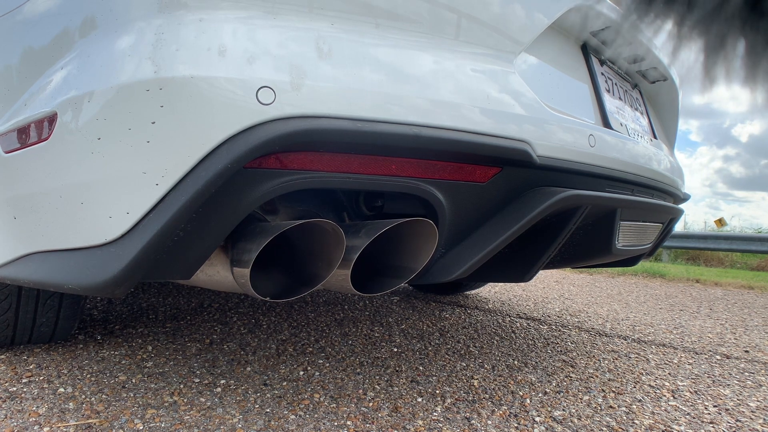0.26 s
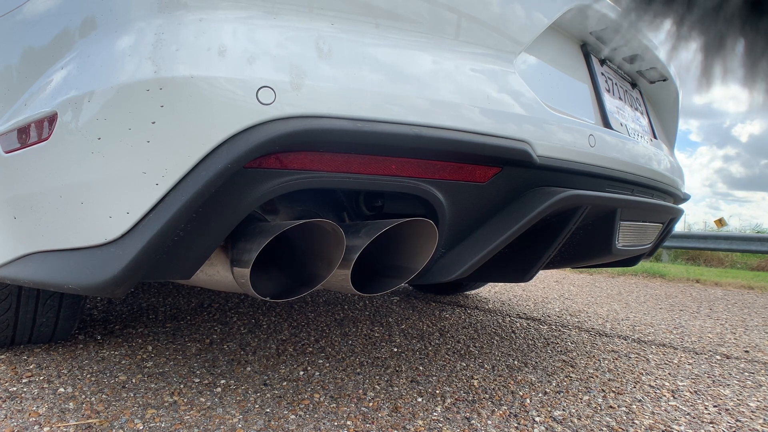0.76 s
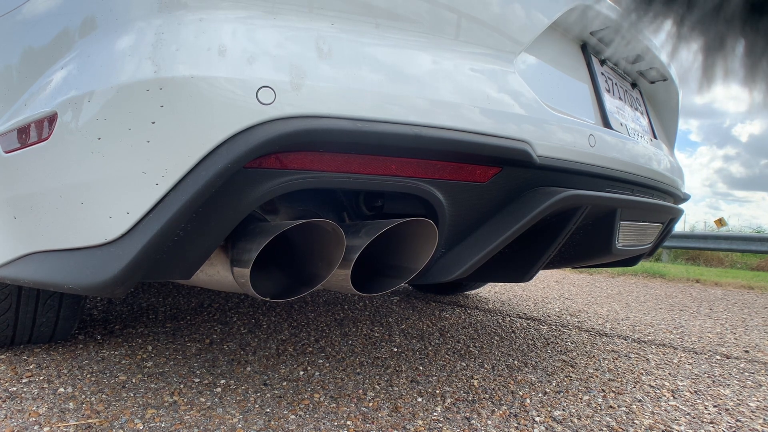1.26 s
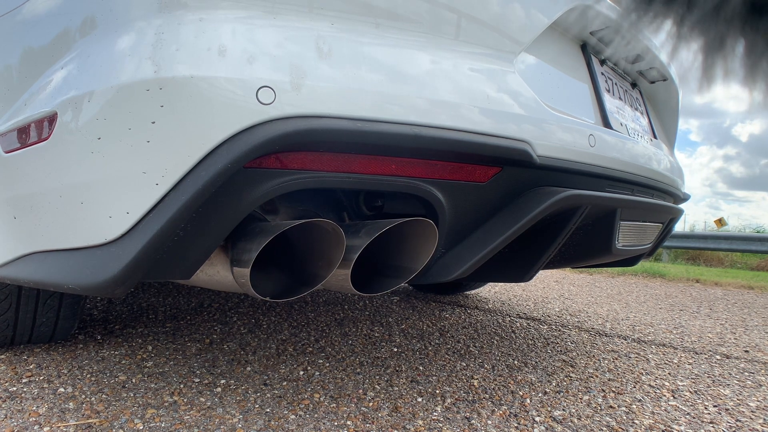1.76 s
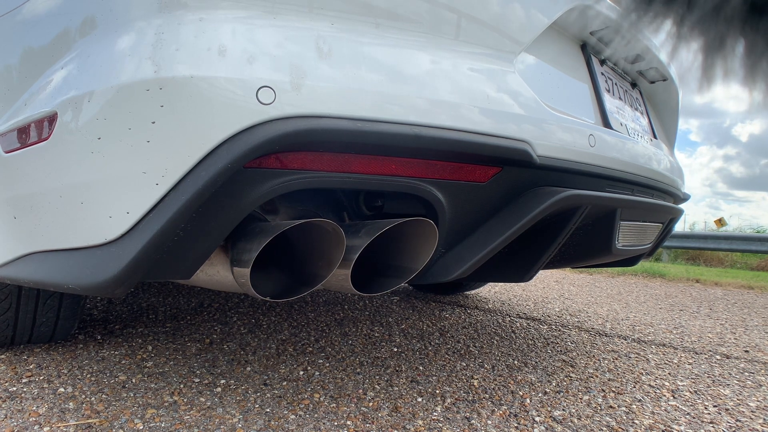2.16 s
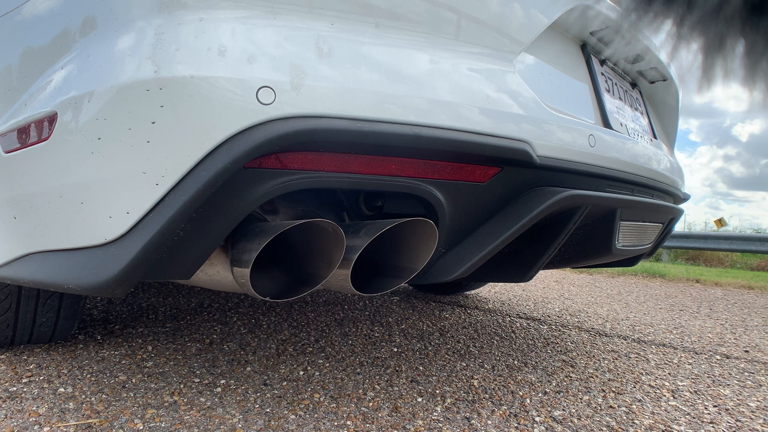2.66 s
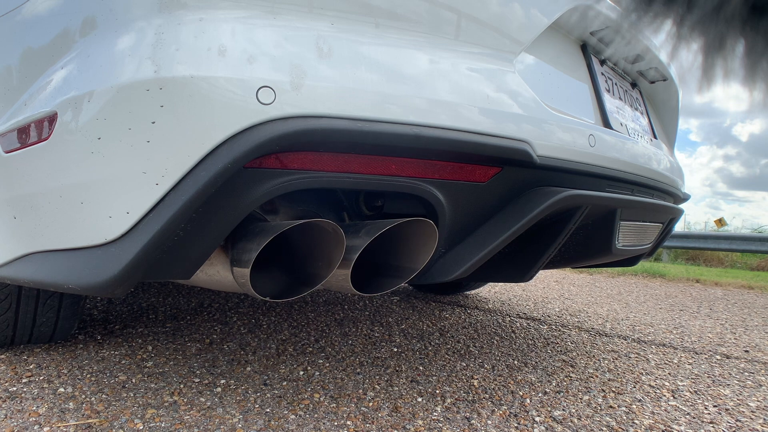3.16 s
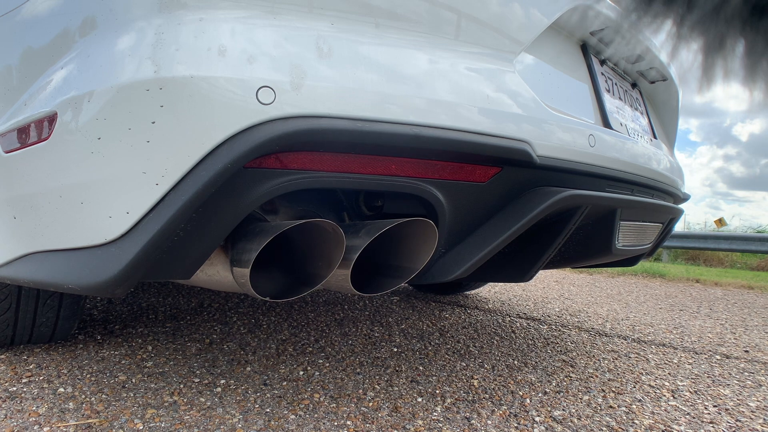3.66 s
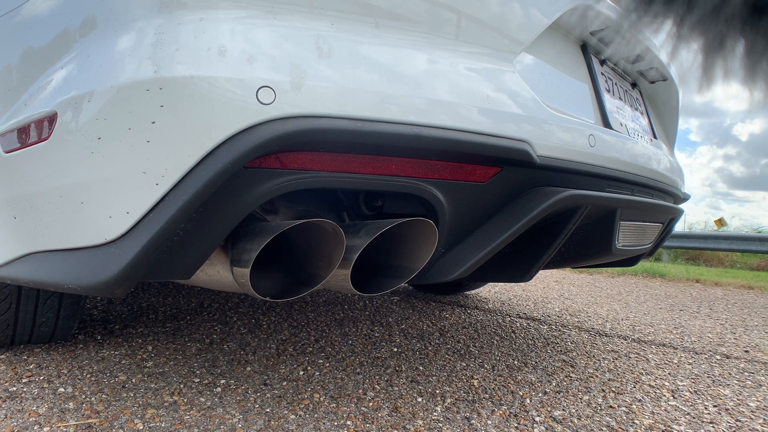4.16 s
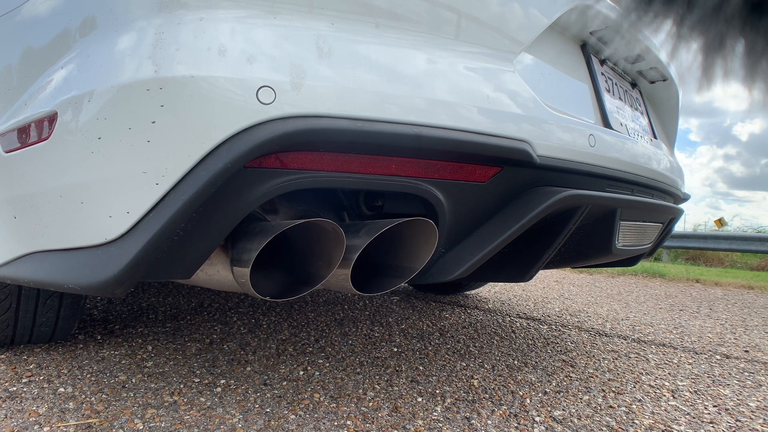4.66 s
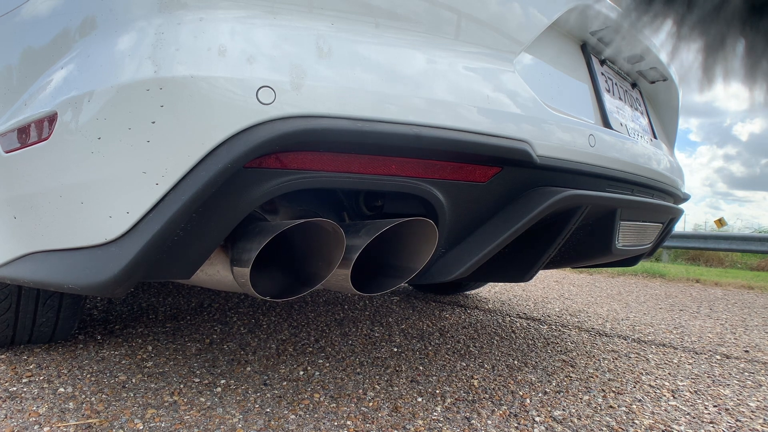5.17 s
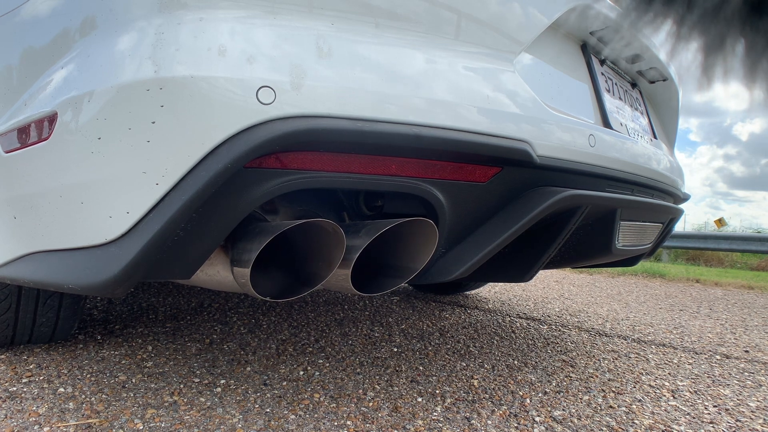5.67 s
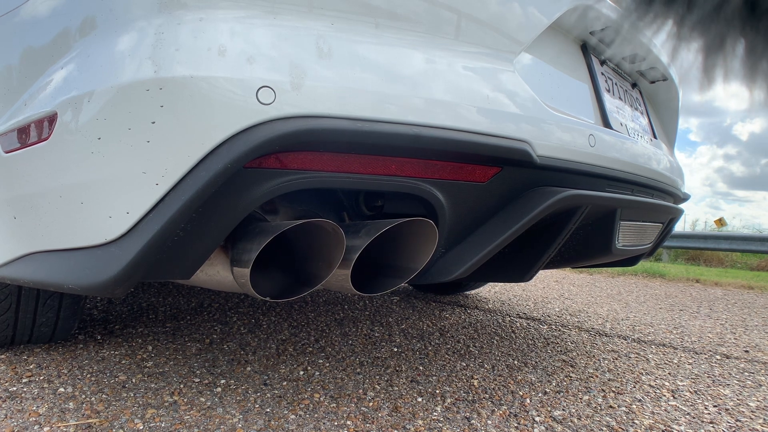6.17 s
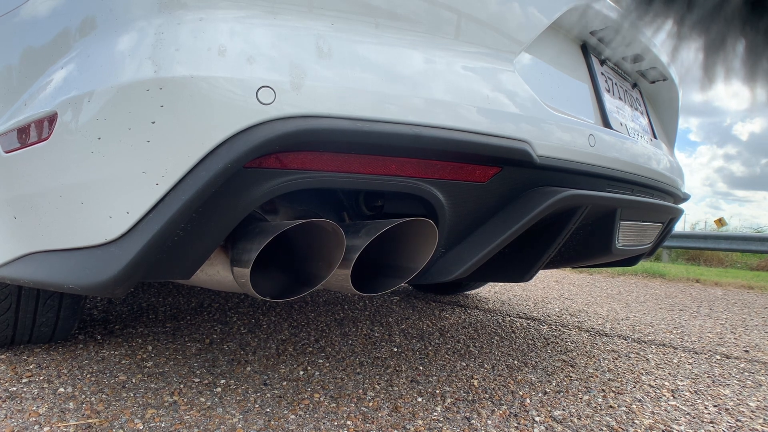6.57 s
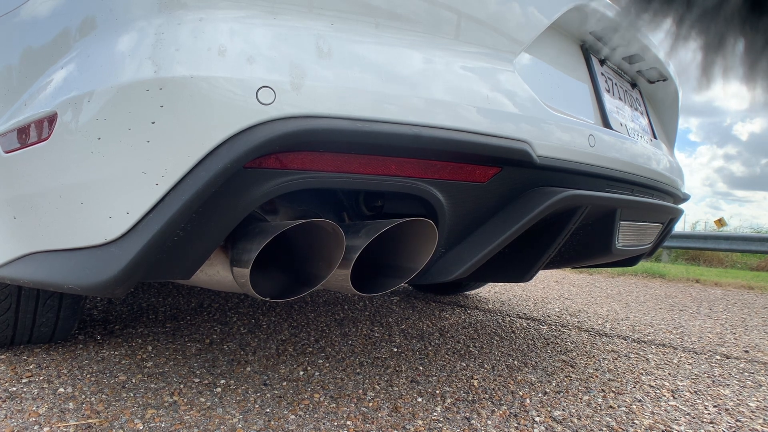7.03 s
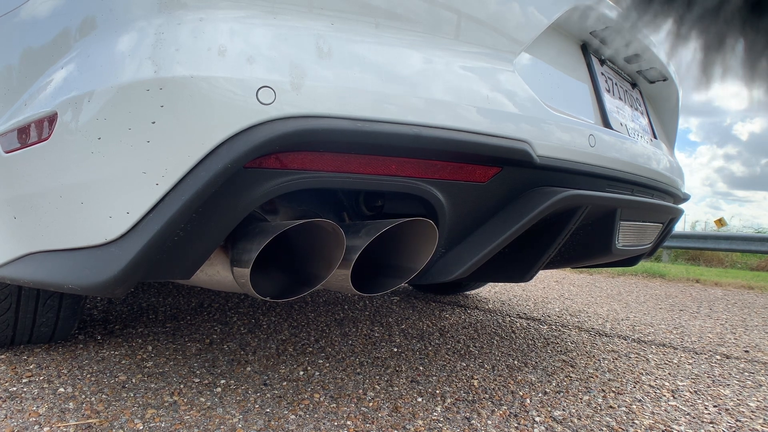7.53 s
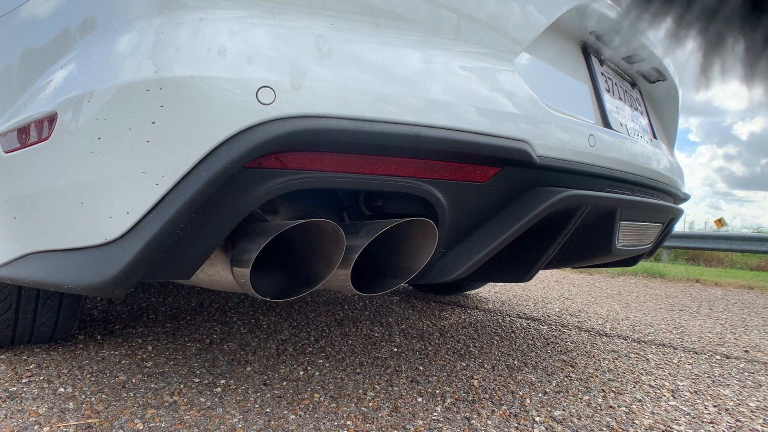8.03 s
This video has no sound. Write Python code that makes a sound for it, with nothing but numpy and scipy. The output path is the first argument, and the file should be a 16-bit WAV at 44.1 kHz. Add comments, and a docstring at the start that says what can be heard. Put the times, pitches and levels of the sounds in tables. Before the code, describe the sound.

Car exhaust outdoors: deep uneven V8 burble slowing to idle, two quick throttle blips, the second louder and cracking, then a long fall to idle.

```python
"""A cross-plane V8 a metre behind its tailpipes, outdoors, falls from a fast run to a limping idle.
After a light touch of the pedal come two blips, the second stronger, and then it sinks to idle again.
Each bank fires unevenly: the pulses ring the pipes over deep tones, gas rasps and the hardest firings crack.
The alternator whines and the engine bay hisses throughout; a loose heat shield ticks as the engine falls,
at the start and after the blips. A light breeze nudges the microphone, which flattens the loudest peaks."""
import sys
import numpy as np
from scipy import signal
from scipy.fft import rfft, irfft, next_fast_len
from scipy.io import wavfile
from scipy.ndimage import uniform_filter1d

SR = 44100
rng = np.random.default_rng(int(sys.argv[2]) if len(sys.argv) > 2 else 0)


def master(y):
    """Save y as 16-bit WAV."""
    cut = np.clip(np.atleast_2d(y).T, -1, 1)
    pcm = np.round(cut * 32767)  # scale
    wavfile.write(sys.argv[1], SR, pcm.astype(np.int16))


N = 366030
TIME = np.arange(N) / SR  # seconds


def undb(db):
    """Decibels to gain."""
    return 10 ** (np.asarray(db) / 20)


def unit(x):
    """Scale to rms 1."""
    return x / np.sqrt(np.mean(x ** 2))


def steady(x, size=6000):
    """Scale to a running rms of 1 over windows of size samples, keeping the throb within each engine cycle."""
    power = uniform_filter1d(uniform_filter1d(x ** 2, size), size)
    return x / np.sqrt(power + 1e-18)


def noise():
    """White noise."""
    return rng.standard_normal(N)


def walk(rate):
    """Random wander of rms 1: straight lines between rate random points per second."""
    points = rng.standard_normal(4000)
    return unit(np.interp(TIME * rate, np.arange(len(points)), points))


def swell(s, half_s):
    """A smooth rise and fall around one moment, peak 1."""
    return np.exp(-((TIME - s) / half_s) ** 2)


def band(x, low_hz, high_hz, order=3):
    """Band-pass."""
    return signal.sosfilt(signal.butter(order, [low_hz, high_hz], "band", fs=SR, output="sos"), x)


def ring(x, modes):
    """Parallel resonances of alternating sign, as along a pipe."""
    out = 0
    for k, (hz, width_hz, db) in enumerate(modes):
        resonance = signal.lfilter(*signal.iirpeak(hz, hz / width_hz, SR), x)
        out = out + (-1) ** k * undb(db) * resonance
    return out


def colour(x, points):
    """Shape x by a gain curve of (Hz, dB) points, on a logarithmic frequency axis."""
    hz, db = np.transpose(points)
    size = next_fast_len(N)
    f = np.arange(size // 2 + 1) * SR / size
    gain = undb(np.interp(np.log(f + 1), np.log(hz), db))
    return irfft(rfft(x, size) * gain, size)[:N]


def lookup(hz, table):
    """Each column of a table of (Hz, values), read at the given frequencies."""
    points, *columns = np.transpose(table)
    return [np.interp(np.log(hz), np.log(points), column) for column in columns]


# Engine speed. Each row: time in seconds, speed in firings per second.
ENGINE_SPEED = [(0, 158), (.5, 99), (1.3, 72), (2, 59), (3.4, 48.3), (3.951, 46.4), (4.39, 64.7),
                (4.6, 136.6), (4.85, 173.4), (5, 117.6), (5.152, 115), (5.3, 180.5), (5.42, 201),
                (5.6, 189.4), (6.2, 134.7), (6.4, 111.4), (7.25, 67.7), (7.8, 58.6), (8.3, 55.8)]


def firing_rate():
    """Firings per second; the time between firings changes evenly from point to point."""
    s, hz = np.transpose(ENGINE_SPEED)
    return 1 / np.interp(TIME, s, 1 / hz)


# Pedal presses: a light touch, then two blips. Each row: pressed in seconds, released in seconds,
# throttle depth from 0 to 1.
PEDAL_PRESSES = [(4.115, 4.408, 0.22), (4.419, 4.692, 0.58), (5.142, 5.377, 0.85)]
ATTACK_S, RELEASE_S = 0.0097, 0.12
FIRST_GULP = 0.57  # share of the load that arrives at once; the rest builds while the pedal is held


def throttle():
    """Load on the engine: it jumps when the pedal is pressed, builds while it is held and drains on release."""
    load = 0
    for on, off, depth in PEDAL_PRESSES:
        attack = 1 - np.exp(-np.clip(TIME - on, 0, None) / ATTACK_S)
        build = np.interp(TIME, [on, off], [FIRST_GULP, 1])
        release = np.exp(-np.clip(TIME - off, 0, None) / RELEASE_S)
        load = load + depth * attack * build * release
    return load


# The cylinders in firing order. Each row: bank (1 near, 0 far), relative strength in dB, header delay in ms.
CYLINDERS = [(1, -1, 0.67), (0, -3, 1.68), (0, 1, 1.456), (1, 3.5, 0.53), (0, -2.5, 1.946), (1, -2, 0.24),
             (1, -2, 0.89), (0, 2, 1.377)]


def firings(cycle, opening, scatter_db, jitter_ms):
    """One pulse each time an exhaust valve opens; every cylinder has its own strength and path."""
    count = np.arange(int(cycle[-1] * len(CYLINDERS)) - 1)
    _, db, delay_ms = np.array(CYLINDERS)[count % len(CYLINDERS)].T
    chance = rng.standard_normal((len(count), 2))
    valve_opens = np.interp(count / len(CYLINDERS) + opening, cycle, np.arange(N))
    at = valve_opens + (delay_ms + jitter_ms * chance[:, 0]) * SR / 1000
    at = np.clip(at, 0, N - 2)
    size = undb(db + scatter_db * chance[:, 1])
    # share each pulse between its two nearest samples
    whole, part = at.astype(int), at % 1
    return np.bincount(whole, size * (1 - part), N) + np.bincount(whole + 1, size * part, N)


def puffs(pulses, decay_s=0.011, leak=1.0):
    """Turbulent gas bursts out after each pulse and never quite stops."""
    flow = signal.lfilter([1], [1, -np.exp(-1 / (decay_s * SR))], pulses)
    return steady((steady(flow) + leak) * noise())


# Deep exhaust tones. Each row: multiple of the engine cycle, level in dB at idle before the passage,
# dB gained per doubling of speed, dB gained at full throttle.
DEEP_TONES = [(3, -36.5, 12, -21), (5, -40, 12, 8.5), (8, -30.5, 3.5, 13), (10, -54, 17.5, 18.5),
              (11, -50.5, 18, 6.5), (13, -51, 12, 15), (16, -33.5, 1, 17.5), (19, -41.5, 9, 13)]
# How the exhaust system passes a tone. Each row: frequency in Hz, gain in dB with both banks in step,
# gain in dB for the limping rhythm.
EXHAUST_PASSAGE = [(18, -8, -18), (28, -1.5, -8), (45, -2, 0), (59.6, 1, -11.5), (83.6, -6, -9),
                   (96, -10, 0), (118, 4.5, 0.5), (163, -14, 0.5), (206, -2.5, -2), (288, -21.5, -16),
                   (345, -9.5, -10.5)]
IDLE_HZ = 47  # firings per second


def drone(cycle, hz, load, lag=0.0756):
    """Deep tones glide through the exhaust's resonances: multiples of 8 from both banks, the rest from a limp."""
    near, strength_db, _ = np.transpose(CYLINDERS)
    # the near bank's uneven firing order sets the phase of each tone
    rhythm = np.angle(np.fft.fft((near > .5) * undb(strength_db)))
    out = 0
    for k, idle_db, rise_db, push_db in DEEP_TONES:
        in_step_db, limping_db = lookup(k * hz / len(CYLINDERS), EXHAUST_PASSAGE)
        passage_db = limping_db if k % len(CYLINDERS) else in_step_db
        db = idle_db + rise_db * np.log2(hz / IDLE_HZ) + push_db * load + passage_db
        phase = 2 * np.pi * k * (cycle - lag) + rhythm[k % len(CYLINDERS)]
        out = out - np.sqrt(2) * undb(db) * np.cos(phase)
    return out


# Low and higher resonances of mufflers and pipes. Each row: frequency in Hz, width in Hz, relative level in dB.
BOOM_MODES = [(110.7, 30, -3), (201.2, 36.5, 0), (215.9, 45.8, -1.5)]
BARK_MODES = [(341.4, 27.8, 1.16), (367, 32.2, 2.3), (416.4, 71, -4)]


def pipes(pulses, gas, boom_db, bark_db):
    """Pulses and turbulence ring the low resonances of mufflers and pipes."""
    boom = band(ring(undb(-3) * gas - pulses, BOOM_MODES), 91.7, 286.6)
    bark = band(ring(undb(-1.5) * gas - pulses, BARK_MODES), 292, 514)
    return steady(boom) * undb(boom_db) + steady(bark) * undb(bark_db)


# Colour of the gas rasp. Each row: frequency in Hz, relative gain in dB.
RASP_COLOUR = [(380, -22), (520, 0), (660, 9), (850, -3.5), (1000, -0.5), (1200, -5), (2000, -12.5),
               (2600, -14.5), (3300, -21), (5000, -28.5), (7000, -27), (11000, -35.5), (15500, -43)]
PIPE_ECHO_HZ = 196.9  # echoes per second inside the tailpipe


def rasp(pulses, gas, db, echo=0.19):
    """The sharp edge of each pulse and its gas noise, echoing between the ends of the tailpipe."""
    source = gas + undb(-13.5) * band(pulses, 280, 2000, order=1)
    trip = int(SR / PIPE_ECHO_HZ)  # samples
    echoes = sum(echo ** k * np.pad(source, (k * trip, 0))[:N] for k in range(1, 4))
    return steady(colour(source + echoes, RASP_COLOUR)) * undb(db)


def cracks(pulses, load, db=-12, steepness=4.6, edge_db=-2):
    """Near full load the firings leave the tailpipe as sharp cracks: a steep front and a short burst of gas."""
    bursts = puffs(pulses, decay_s=0.0045, leak=.1) + undb(edge_db) * pulses
    return steady(band(bursts, 780, 2370, order=2)) * undb(db) * load ** steepness


# Exhaust levels with the throttle shut. Each row: speed in firings per second, pipe boom in dB,
# pipe bark in dB, gas rasp in dB.
SHUT_LEVELS = [(47.5, -35.5, -43, -54.5), (56.32, -31.5, -42.5, -54), (67.4, -25, -36, -47.5),
               (77.92, -24, -31, -44.5), (96.6, -19.5, -29, -41), (127, -15.5, -24.5, -34),
               (169.6, -16, -21.5, -32.5), (199.46, -16.5, -14.5, -34)]
# what full throttle adds to each voice
PUSH_BOOM_DB, PUSH_BARK_DB, PUSH_RASP_DB = 18.5, 19, 24
# Brief dips of drone and pipes. Each row: centre in seconds, half length in seconds, depth in dB.
NOTE_DIPS = [(0.29, 0.023, -7), (4.037, 0.045, -5), (5.067, 0.097, -2), (5.141, 0.011, -8.5),
             (5.657, 0.026, -7)]


def exhaust(cycle, hz, load):
    """Firing pulses and their gas drive the pipes, rasp and cracks over the drone; load pushes them harder."""
    pulses = steady(firings(cycle, opening=.05, scatter_db=2.8, jitter_ms=0.15))
    gas = puffs(pulses)
    boom_db, bark_db, rasp_db = lookup(hz, SHUT_LEVELS)
    body = drone(cycle, hz, load)
    body = body + pipes(pulses, gas, boom_db + PUSH_BOOM_DB * load, bark_db + PUSH_BARK_DB * load)
    dip_db = sum(db * swell(s, half_s) for s, half_s, db in NOTE_DIPS)
    return body * undb(dip_db) + rasp(pulses, gas, rasp_db + PUSH_RASP_DB * load) + cracks(pulses, load)


# Alternator tones. Each row: multiple of the base pitch, relative level in dB.
WHINE_TONES = [(2, 0), (3, -1), (4, -4.5), (5, -8.5), (6, -14), (7, -5.5)]
# Resonances of the alternator housing. Each row: frequency in Hz, width in Hz, relative level in dB.
HOUSING_MODES = [(2080, 200, -5), (3550, 330, -3.5), (4104, 310, -3), (6300, 560, -3)]


def alternator(cycle, hz, multiple=146.4, rise=0.88, db=-60):
    """Belt-driven whine: its tones light up as they glide through the resonances of the housing."""
    turn = 2 * np.pi * multiple * cycle  # base pitch: multiple turns per engine cycle
    tones = 0
    for k, tone_db in WHINE_TONES:
        audible = k * multiple * hz / len(CYLINDERS) < SR / 2  # mute what would alias
        level = undb(tone_db + 4.2 * walk(45))
        tones = tones + level * np.sin(k * turn + 0.24 * k * walk(130)) * audible
    sung = band(ring(tones, HOUSING_MODES), 1900, 7200)
    return undb(db) * sung * (hz / hz.min()) ** rise


# Colour of the engine bay hiss. Each row: frequency in Hz, relative gain in dB.
BAY_COLOUR = [(300, -0.5), (820, -15), (940, 12.5), (1080, -14.5), (1700, -7.5), (2500, -11), (3000, -16),
              (4100, -13.5), (5000, -28), (7000, -19.5), (8300, -30), (9800, -21.5), (10800, -29),
              (15000, -44)]


def engine_bay(cycle, hz, slowest_db=-56, rise=1.0, clatter=0.16):
    """Belts, fan and valve gear hiss from under the car, pulsing with the valves and growing with speed."""
    valves = 1 + clatter * np.cos(2 * np.pi * len(CYLINDERS) * cycle)
    hiss = unit(colour(noise() * valves, BAY_COLOUR))
    return hiss * undb(slowest_db + 0.89 * walk(11)) * (hz / hz.min()) ** rise


# Ticks of a loose heat shield. Each row: time in seconds, level in dB before the common gain.
SHIELD_TICKS = [(0.186, -40), (0.256, -43), (6.102, -45), (6.162, -42), (6.2254, -41), (6.2901, -41),
                (6.3619, -36.5), (6.4439, -39)]


def heat_shield(decay_s=0.0058, gain_db=-7):
    """Thin, bright ticks of decaying noise as the falling engine shakes the sheet metal."""
    blows = np.zeros(N)
    for s, db in SHIELD_TICKS:
        blows[int(s * SR)] += undb(db + gain_db)
    fade = signal.lfilter([1], [1, -np.exp(-1 / (decay_s * SR))], blows)
    return fade * unit(band(noise(), 8300, 14000, order=2))


# Gusts on the microphone. Each row: peak in seconds, half length in seconds, level in dB added to the calm.
BREEZE_GUSTS = [(0.517, 0.27, -23), (4.935, 0.17, -17.5), (6.865, 0.16, -17), (7.795, 0.38, -21.5)]
CALM_DB = -36


def breeze():
    """Slow swells of air pressure on the microphone: very low noise under a calm floor and gusts."""
    strength = undb(CALM_DB) + sum(undb(db) * swell(s, half_s) for s, half_s, db in BREEZE_GUSTS)
    # Each pair: frequency in Hz, relative gain in dB.
    rumble = [(1, -3), (5, -11.5), (12, -17), (25, -30.5), (60, -38.5), (300, -75), (2000, -120)]
    return steady(colour(noise(), rumble)) * strength


def scene():
    """Engine speed drives exhaust, alternator and bay; the throttle pushes the exhaust harder."""
    hz, load = firing_rate(), throttle()
    cycle = np.cumsum(hz) / SR / len(CYLINDERS)  # one cycle is two turns of the crank
    engine = exhaust(cycle, hz, load) + alternator(cycle, hz) + engine_bay(cycle, hz)
    return (engine + heat_shield() + breeze())[None]


TOP_HZ, FADE_S = 15700, .005


def record(dry, ceiling=0.45, knee=24.0):
    """The microphone flattens the loudest peaks; the end fades quickly and the top is cut."""
    clipped = dry / (1 + np.abs(dry / ceiling) ** knee) ** (1 / knee)
    fade = np.clip((TIME[-1] - TIME) / FADE_S, 0, 1)
    top_cut = signal.ellip(10, .1, 80, TOP_HZ, fs=SR, output="sos")
    return signal.sosfilt(top_cut, clipped * fade)


dry = scene()
out = record(dry)
master(out)
```